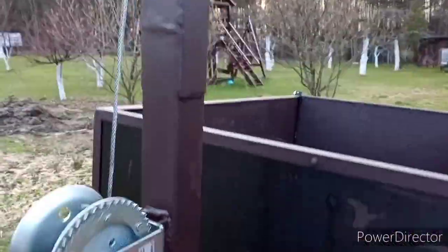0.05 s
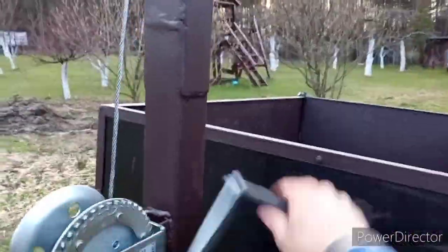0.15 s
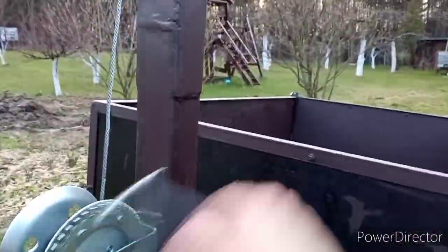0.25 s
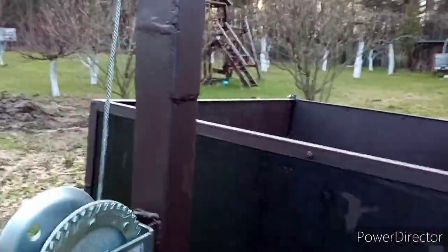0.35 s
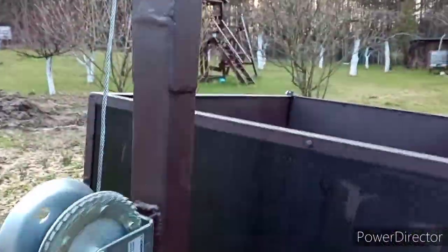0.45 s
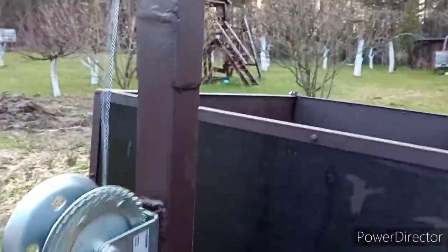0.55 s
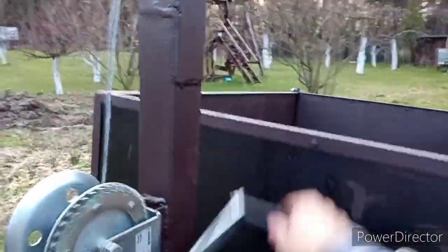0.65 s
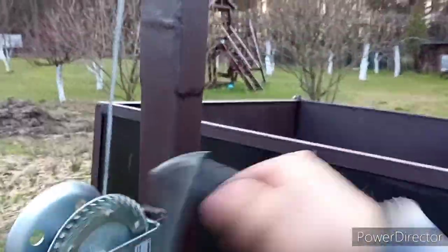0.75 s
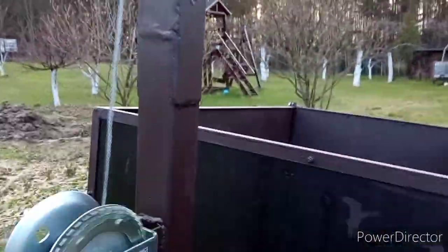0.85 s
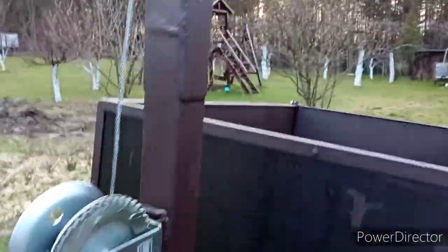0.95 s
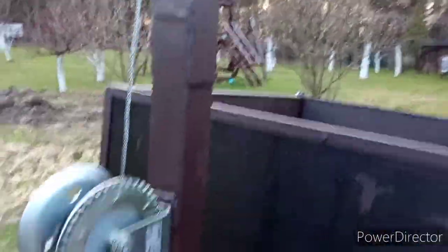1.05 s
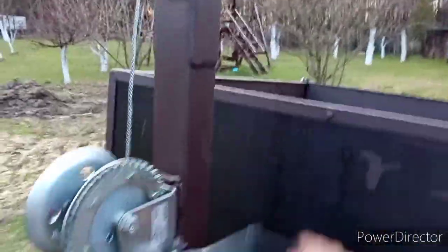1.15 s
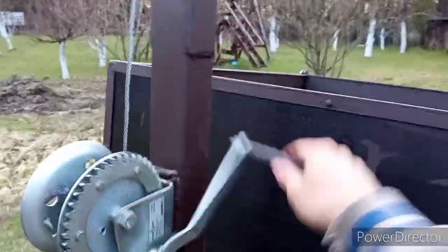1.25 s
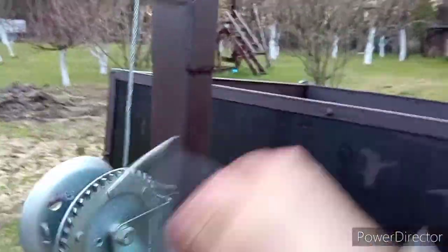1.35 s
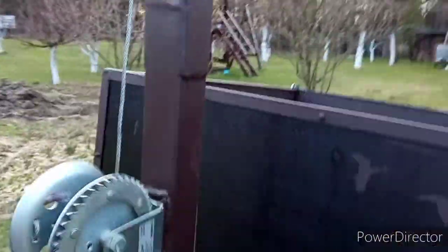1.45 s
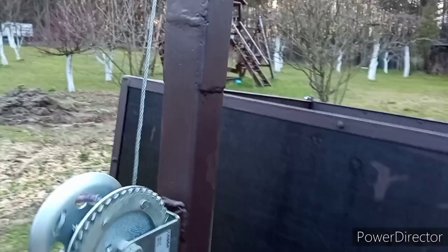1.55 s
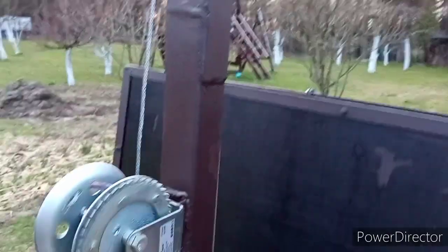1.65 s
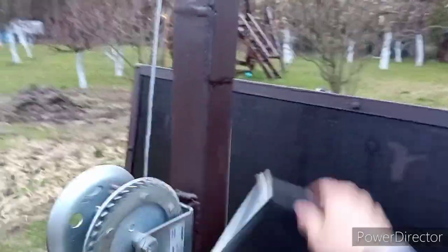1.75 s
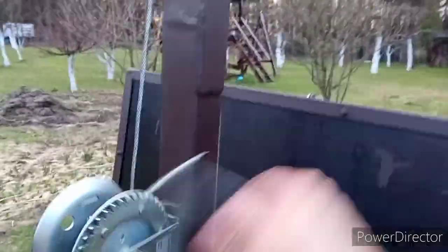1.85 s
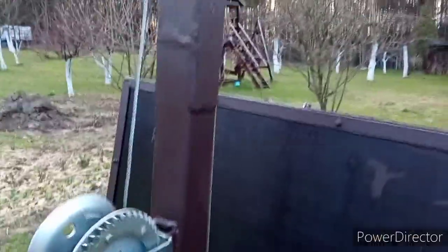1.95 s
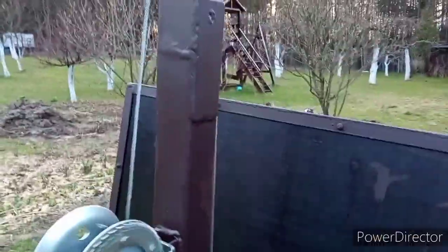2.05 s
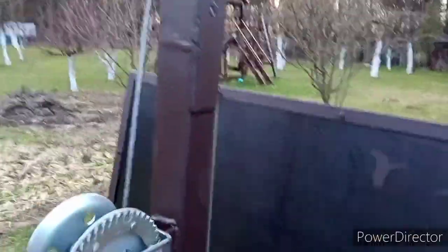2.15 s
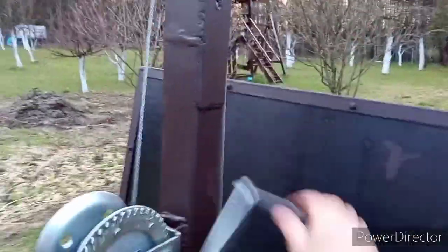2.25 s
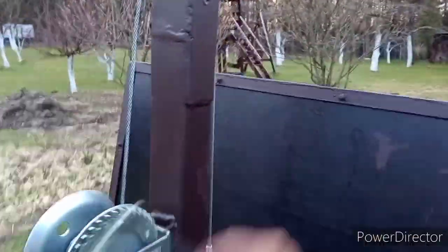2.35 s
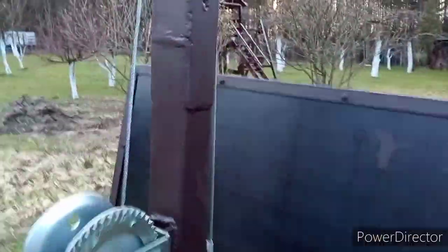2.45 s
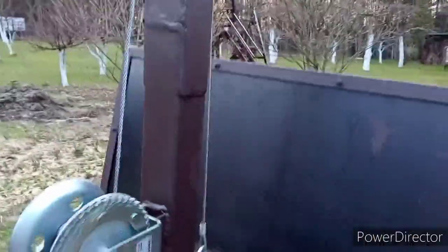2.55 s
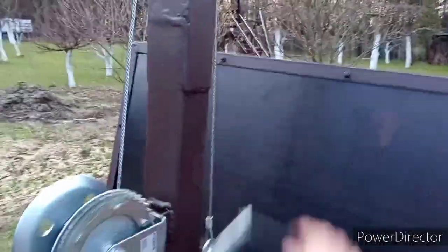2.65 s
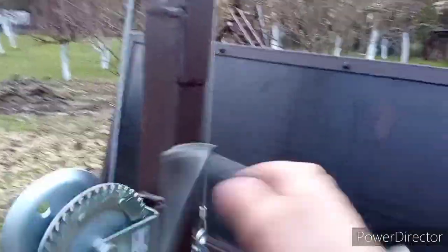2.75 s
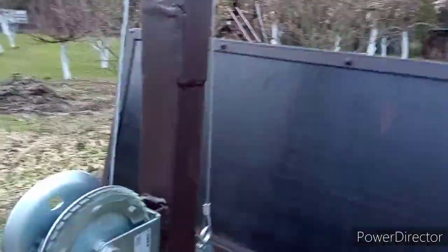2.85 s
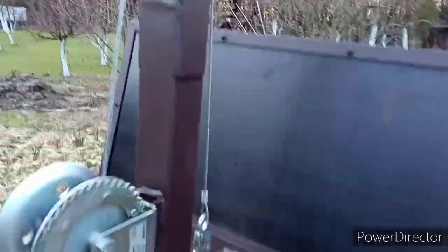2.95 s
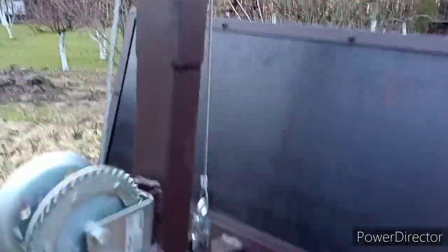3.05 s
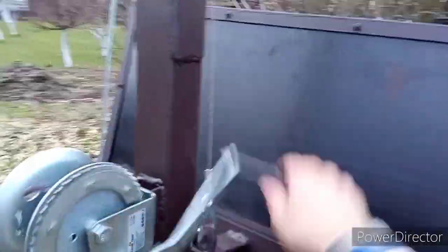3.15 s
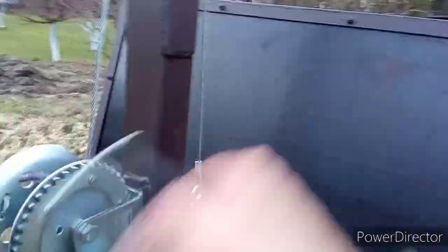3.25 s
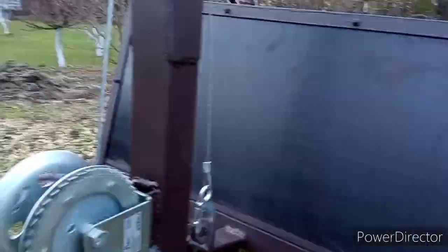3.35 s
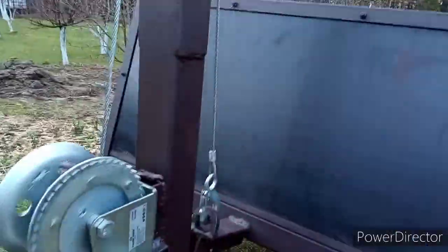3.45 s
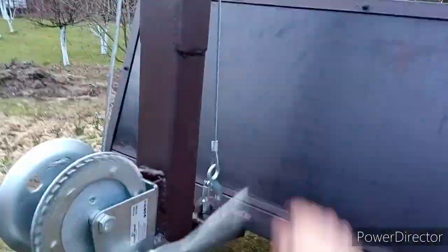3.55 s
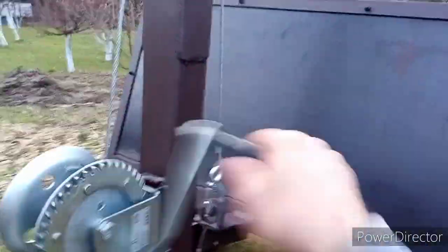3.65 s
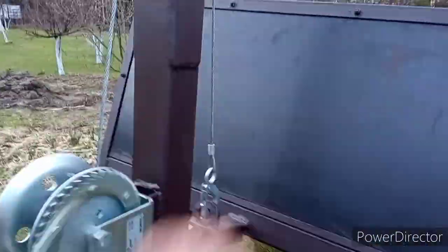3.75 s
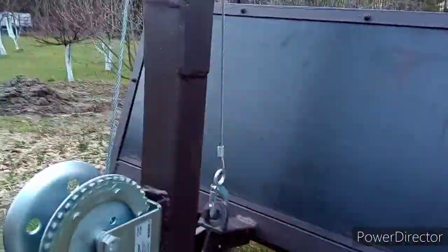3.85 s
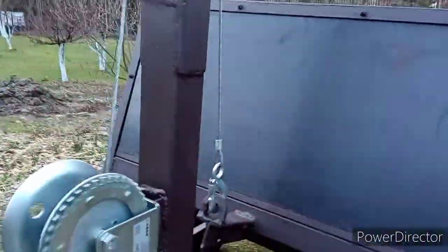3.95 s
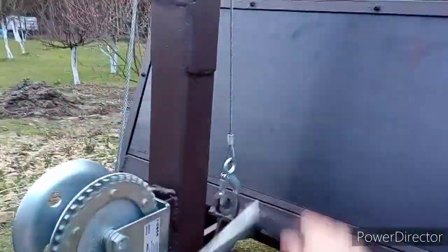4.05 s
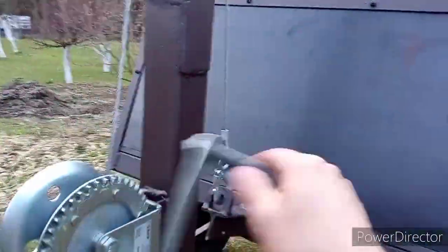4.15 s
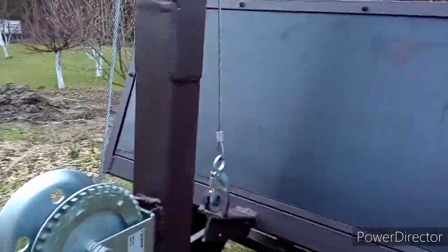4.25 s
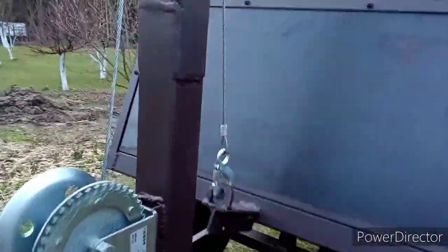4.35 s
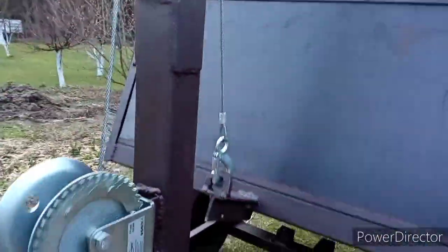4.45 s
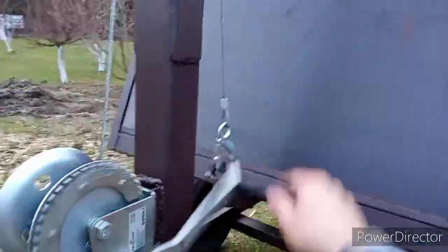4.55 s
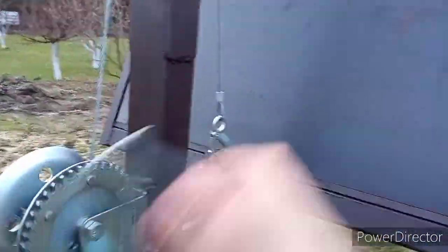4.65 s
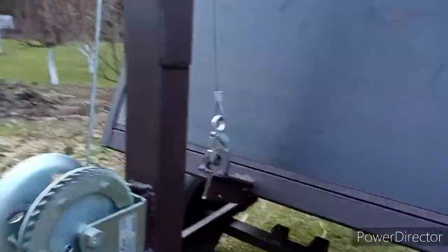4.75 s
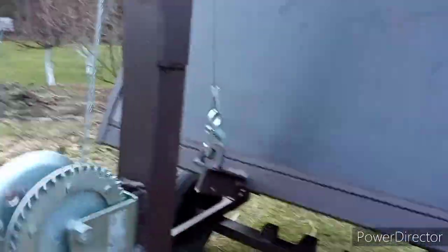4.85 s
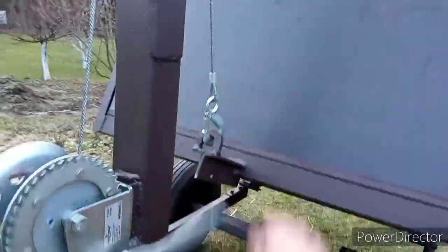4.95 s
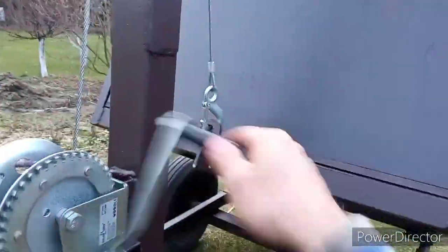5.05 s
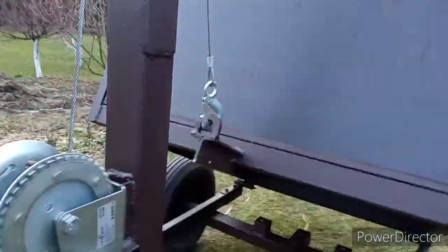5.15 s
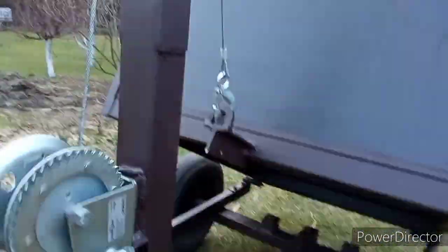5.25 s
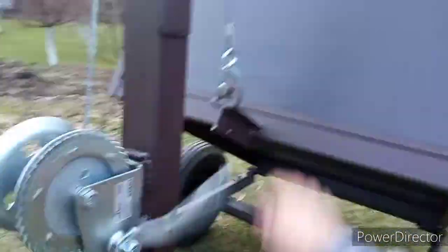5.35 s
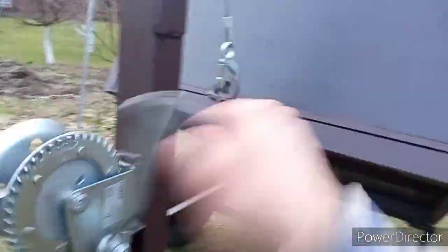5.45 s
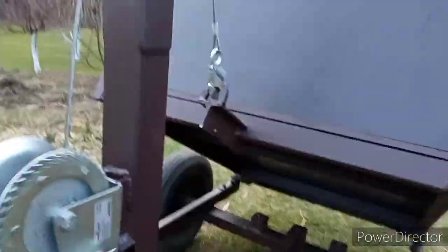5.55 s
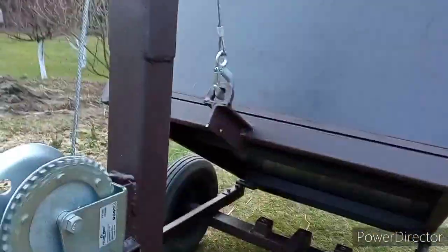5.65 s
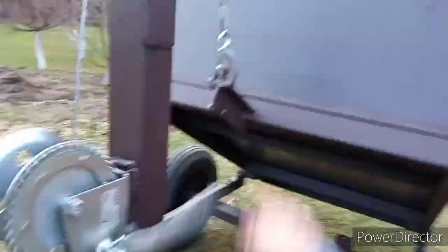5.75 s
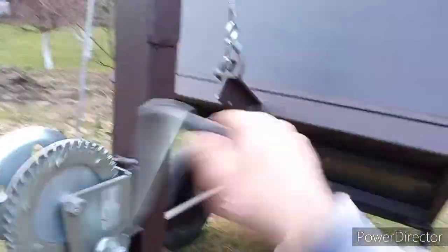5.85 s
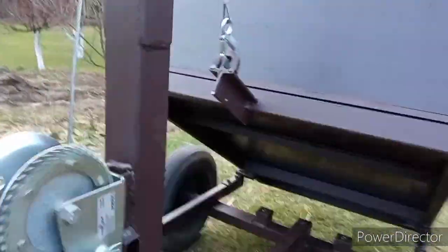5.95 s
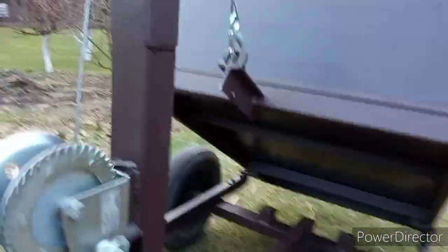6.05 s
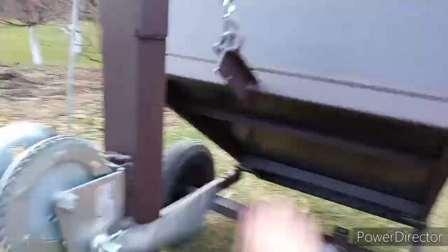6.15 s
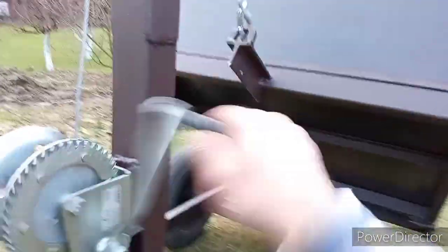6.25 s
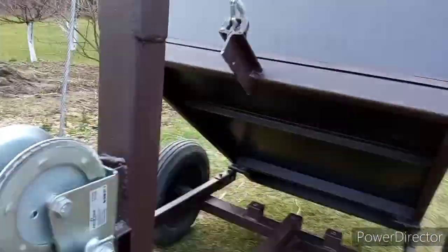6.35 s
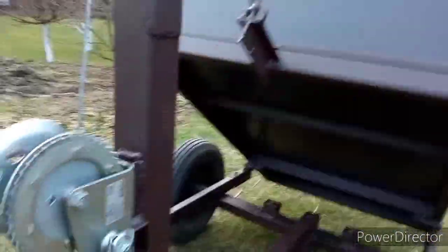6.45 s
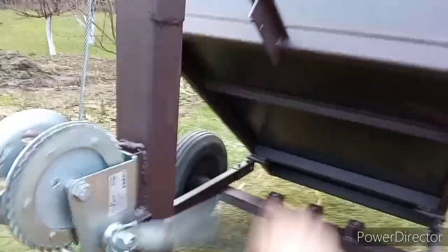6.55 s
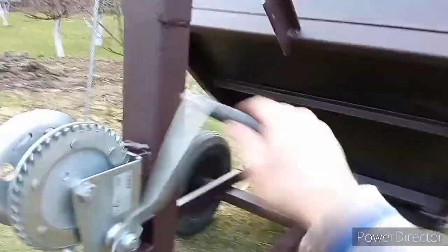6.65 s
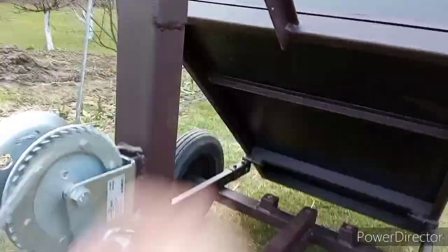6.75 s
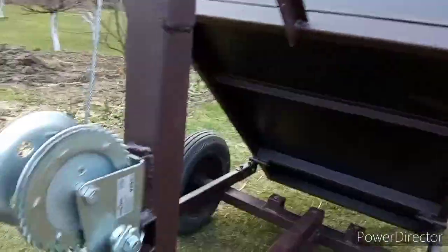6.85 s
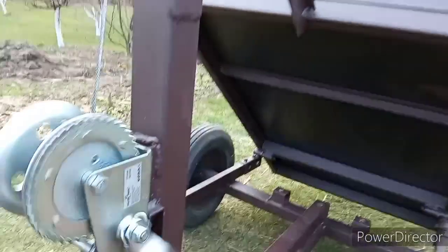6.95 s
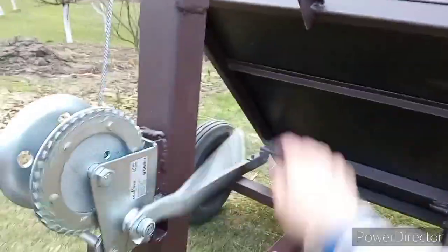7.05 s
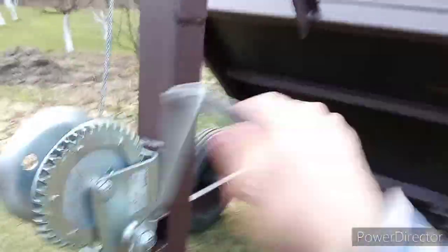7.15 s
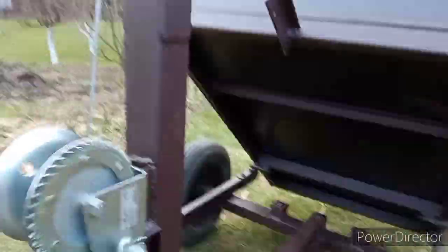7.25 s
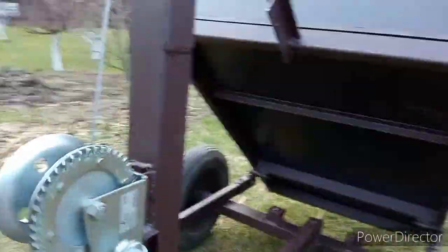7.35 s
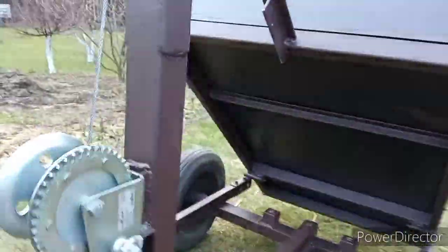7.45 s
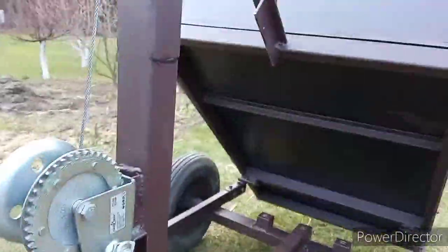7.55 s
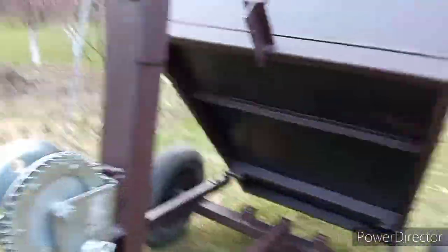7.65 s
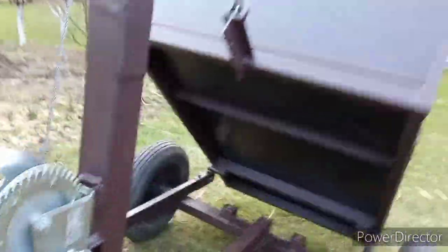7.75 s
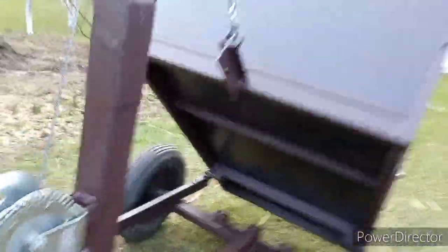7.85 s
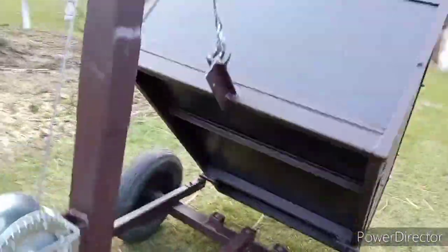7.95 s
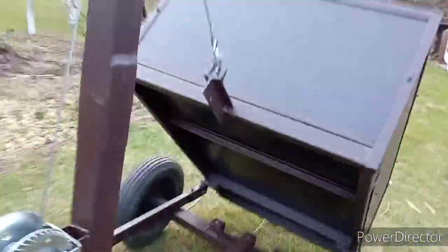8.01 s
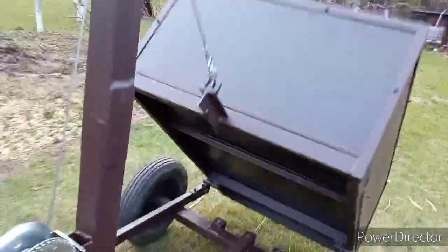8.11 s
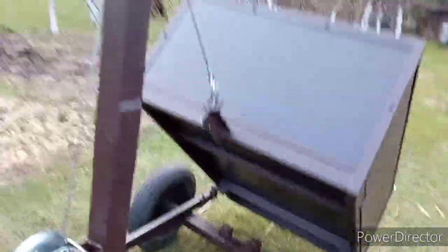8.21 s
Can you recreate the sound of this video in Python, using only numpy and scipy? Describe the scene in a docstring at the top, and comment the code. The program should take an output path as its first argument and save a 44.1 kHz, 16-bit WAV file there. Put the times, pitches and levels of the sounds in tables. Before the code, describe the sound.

Sharp steel clicks come in a quick, unbroken stream from a nearby hand winch lifting a heavy box in the open air. Each click rings briefly, with scattered low thumps, a steady rubbing hiss and an occasional tiny squeak. Near the end the crank stops, leaving a short metallic ring, some light ticks and knocks and a hollow clunk, before everything drops almost to silence.

```python
"""A pawl drops tooth by tooth onto the eleven-tooth ratchet wheel of a hand winch.
Each impact excites the modes of wheel, frame and cable drum, with a short low thump and one rebound.
A bearing squeaks now and then over the rubbing hiss of cable and gears and the background noise.
When the crank stops, the frame rings on, loose parts tick and rattle, the load settles with a clunk,
and the hiss fades and is then gated down."""
import sys
import numpy as np
from scipy import signal
from scipy.io import wavfile

SR = 44100
rng = np.random.default_rng(int(sys.argv[2]) if len(sys.argv) > 2 else 0)


def master(y):
    """Save y as 16-bit WAV."""
    cut = np.clip(np.atleast_2d(y).T, -1, 1)
    pcm = np.round(cut * 32767)  # scale
    wavfile.write(sys.argv[1], SR, pcm.astype(np.int16))


N = 365148


def ratchet():
    """Impact excitation: the pawl strikes each tooth and rebounds, more softly as the load rises."""
    # pawl drops, one for each tooth: start_s
    drops = [.0075, .0533, .1067, .1605, .2149, .2693, .3212, .3681, .414, .4618, .5127, .5606, .607, .6564,
             .7058, .7567, .8061, .849, .8869, .9313, .9842, 1.0316, 1.0829, 1.1418, 1.2042, 1.259, 1.3134,
             1.3658, 1.4137, 1.4606, 1.508, 1.5534, 1.6048, 1.6531, 1.694, 1.7459, 1.7928, 1.8382, 1.8846,
             1.93, 1.9724, 2.0158, 2.0612, 2.1071, 2.148, 2.1879, 2.2333, 2.2787, 2.3211, 2.363, 2.4044,
             2.4428, 2.4813, 2.5227, 2.5601, 2.598, 2.6359, 2.6783, 2.7247, 2.7691, 2.8125, 2.8554, 2.8963,
             2.9412, 2.9841, 3.025, 3.0639, 3.1004, 3.1408, 3.1852, 3.2266, 3.2705, 3.3114, 3.3523, 3.3947,
             3.4386, 3.4775, 3.5149, 3.5508, 3.5917, 3.6321, 3.6735, 3.7184, 3.7618, 3.8023, 3.8402, 3.8821,
             3.9245, 3.9619, 3.9983, 4.0422, 4.0921, 4.14, 4.1874, 4.2323, 4.2752, 4.3186, 4.3625, 4.4064,
             4.4473, 4.4827, 4.5241, 4.5675, 4.6114, 4.6533, 4.6912, 4.7272, 4.7651, 4.808, 4.8454, 4.8823,
             4.9212, 4.9611, 5.005, 5.0479, 5.0938, 5.1357, 5.1726, 5.2106, 5.252, 5.2869, 5.3203, 5.3542,
             5.3896, 5.4276, 5.464, 5.5029, 5.5408, 5.5772, 5.6121, 5.6521, 5.691, 5.7279, 5.7623, 5.7972,
             5.8351, 5.874, 5.9155, 5.9544, 5.9883, 6.0227, 6.0621, 6.0965, 6.1325, 6.1679, 6.2038, 6.2412,
             6.2761, 6.3165, 6.3545, 6.3904, 6.4268, 6.4637, 6.5016, 6.54, 6.5794, 6.6174, 6.6543, 6.6897,
             6.7336, 6.7775, 6.8189, 6.8628, 6.9057, 6.9466, 6.994, 7.0374, 7.0723, 7.1082, 7.1511, 7.2025,
             7.2509, 7.2933, 7.3372, 7.3861, 7.4345, 7.5004]
    # teeth of the wheel in turn: drop_db, light_thump_db
    teeth = [(-8.5, -38), (-7.5, -38.5), (-7.5, -46.5), (-7.5, -42), (-8, -29), (-8.5, -43.5), (-8, -44),
             (-9, -41.5), (-8.5, -40), (-7.6, -39), (-7.5, -36)]
    # first crack of pawl on tooth: band_hz, level_db, t60_s
    crack_bands = [(202, -36.5, 0.017), (595, -26.5, 0.01), (870, -20.5, 0.016), (3260, -19, 0.018),
                   (5000, -11.5, 0.033), (7500, -10.5, 0.014)]
    # clatter of the many small modes: band_hz, level_db, t60_s
    clatter_bands = [(250, -35.5, 0.061), (443, -30, 0.06), (670, -27, 0.089), (910, -16.5, 0.059),
                     (1120, -22, 0.095), (1400, -27, 0.43), (1710, -29, 0.11), (2080, -16, 0.067),
                     (3360, -13, 0.096), (3820, -13, 0.22), (4250, -11.5, 0.079), (4600, -18.5, 0.07),
                     (5350, -23.5, 0.061), (6410, -19.5, 0.074), (7900, -1.5, 0.042)]
    # strong low thumps, each given to the nearest drop: near_s, level_db
    strong_thumps = [(0.0084, -26.5), (0.0536, -29), (0.161, -28), (0.2689, -28), (0.4622, -19.5),
                     (0.6072, -27.5), (0.6567, -21.5), (1.0319, -23), (1.0829, -24.5), (1.2593, -24.5),
                     (1.312, -30), (1.4138, -24.5), (1.5082, -28), (1.554, -23.5), (1.7934, -23),
                     (1.8852, -31), (2.1486, -25.5), (2.1882, -30.5), (2.321, -27), (2.5226, -23.5),
                     (2.8131, -22), (2.9844, -26.5), (3.064, -22), (3.2262, -28.5), (3.3947, -22),
                     (3.4384, -21.0), (3.5145, -21.0), (3.5511, -25), (3.7189, -26), (3.962, -18.5),
                     (3.9991, -25.5), (4.0924, -26.5), (4.14, -24.5), (4.1877, -23.5), (4.2753, -24.5),
                     (4.3188, -33.5), (4.3629, -23), (4.4066, -25), (4.4831, -27.5), (4.9203, -28.5),
                     (5.0928, -18), (5.134, -29), (5.2519, -25.5), (5.4636, -20.5), (5.7277, -27),
                     (5.8355, -24), (5.8738, -26), (5.9157, -18.5), (5.9885, -26), (6.0622, -24.5),
                     (6.0963, -26.5), (6.1319, -28), (6.1676, -29), (6.2766, -20.5), (6.5015, -32),
                     (6.6897, -26), (6.7331, -26), (6.9466, -23.0), (6.9939, -21.5), (7.1082, -25.5)]
    fade_db_per_s, bounce_s, bounce_db = 0.1967, 0.0096, -16.5
    settle_s, damping_db_per_s = 7.81, 250
    drop_s = np.array(drops)
    tooth_db, light_thump_db = np.resize(teeth, (len(drop_s), 2)).T
    delay_scatter, bounce_scatter, drop_scatter, thump_scatter = rng.standard_normal((len(drop_s), 4)).T
    drop_db = tooth_db - fade_db_per_s * drop_s + 0.58 * drop_scatter
    drop_db[drop_s > 7.1] += 1   # the slow last drops fall harder
    blow_s = np.concatenate([drop_s, drop_s + bounce_s + 0.00042 * delay_scatter])
    blow_db = np.concatenate([drop_db, drop_db + bounce_db + 3 * bounce_scatter])
    crack = noise_bursts(blow_s, blow_db + 1, crack_bands, rise_s=0.0001)
    clatter = noise_bursts(blow_s, blow_db - 2, clatter_bands, rise_s=0.00035)
    strong_s, strong_db = np.transpose(strong_thumps)
    thump_db = light_thump_db + 5.5 * np.minimum(thump_scatter, 1)
    thump_db[np.abs(drop_s - strong_s[:, None]).argmin(axis=1)] = strong_db
    # with the crank at rest nothing drags on the frame, so its low modes ring on
    free_ring = wheel_and_frame(drop_s[-1:], drop_db[-1:] - 6.5, spread_db=1.5, t60_scale=3.2, top_hz=2900)
    steel = wheel_and_frame(blow_s, blow_db + 1, spread_db=3.5)
    # the settling load damps drum and frame
    damping = from_db(-damping_db_per_s * np.maximum(np.arange(N) / SR - settle_s, 0))
    long_rings = damping * (free_ring + cable_drum(drop_s, drop_db))
    return steel + crack + clatter + low_thump(drop_s, thump_db) + long_rings


def wheel_and_frame(times, db, spread_db, t60_scale=1, top_hz=SR):
    """Modal superposition: every blow excites each steel mode with a strength of its own."""
    # modes of wheel and frame: pitch_hz, level_db at each of four tilts, t60_s
    modes = [(592, -30, -34, -34, -33, 0.27), (759, -28, -26, -27, -31, 0.19),
             (1089, -30, -29, -26, -24, 0.16), (1168, -38, -35, -32, -34, 0.3),
             (1308, -44, -33, -33, -30, 0.3), (1385, -28, -24, -27, -28, 0.1),
             (1436, -22, -23, -23, -19, 0.2), (1680, -36, -37, -37, -34, 0.25),
             (1783, -18, -23, -30, -25, 0.17), (1846, -24, -28, -32, -36, 0.22),
             (1920, -25, -26, -23, -17, 0.15), (1985, -32, -27, -27, -25, 0.12),
             (2270, -30, -28, -29, -19, 0.18), (2482, -31, -40, -38, -32, 0.15),
             (2728, -30, -30, -28, -33, 0.13), (3091, -33, -27, -26, -24, 0.1),
             (3403, -25, -23, -25, -34, 0.13), (3550, -21, -21, -20, -21, 0.1),
             (3650, -23, -20, -25, -31, 0.1), (3734, -13, -13, -15, -20, 0.09),
             (3810, -17, -20, -21, -21, 0.1), (3860, -21, -20, -23, -26, 0.1),
             (3945, -24, -23, -23, -25, 0.09), (4080, -24, -23, -24, -27, 0.09),
             (4430, -17, -17, -22, -28, 0.05), (4562, -29, -26, -21, -20, 0.07),
             (4770, -18, -18, -22, -18, 0.05), (4925, -18, -17, -15, -20, 0.05),
             (5030, -19, -18, -15, -21, 0.055), (6180, -19, -26, -23, -22, 0.035)]
    # moments of the four tilts of the box, which set the modes that carry: time_s
    tilt_s = [0, 2.5, 5, 7.5]
    out = np.zeros(N)
    for k, (hz, *levels_db, t60) in enumerate(modes):
        mode_db = np.interp(times, tilt_s, levels_db) + spread_db * rng.standard_normal(len(times))
        polarity = (-1) ** k   # neighbours start opposed, so close pairs swell just after the blow
        if hz < top_hz:
            out += ring(clicks(times, polarity * from_db(db + mode_db)), hz, t60_scale * t60)
    return out


def low_thump(times, db):
    """Heavily damped oscillation: a short low thump with each click, strong on some drops."""
    pulse = signal.lfilter(*signal.butter(2, 1100, fs=SR), clicks(times + 0.00038, from_db(db)))
    low_tail = from_db(14.5) * ring(pulse, 160, 0.0068) + from_db(-6.5) * ring(pulse, 120, 0.028)
    return from_db(17) * ring(pulse, 580, 0.0019) - low_tail


def cable_drum(times, db):
    """Resonance: one lightly damped partial builds up when blows fall in phase with it."""
    # how strongly a drop rings the drum: time_s, gain_db
    coupling = [(0, -30.5), (1.2, -27), (2.6, -30.5), (3.2, -38.5), (7.35, -33.5), (7.5, -15)]
    coupling_db = np.interp(times, *np.transpose(coupling))
    return ring(clicks(times, from_db(db + coupling_db)), hz=1539, t60=0.8)


def loose_parts():
    """Free vibration after light impacts: parts tick, knock and ring the shackle; the load clunks."""
    # impacts after the crank stops: start_s, tick_db, knock_db
    impacts = [(7.5506, -18.5, -40), (7.64, -40, -49), (7.666, -34, -51), (7.6994, -36, -51),
               (7.751, -21, -49), (7.7987, -29, -58), (7.816, -31, -47), (7.8265, -27, -40),
               (7.8465, -25, -55), (7.8534, -41, -52), (7.878, -28.5, -49), (7.916, -25, -51),
               (7.9513, -34, -57), (7.979, -24, -63), (8.0147, -47, -60.5), (8.177, -57, -67),
               (8.2277, -51, -78)]
    # bright ticks: band_hz, level_db, t60_s
    tick_bands = [(300, -39, 0.043), (1000, -34.5, 0.11), (2280, -14, 0.13), (4000, -8.5, 0.06),
                  (6500, -9, 0.027), (8000, -22, 0.027)]
    # dull knocks: band_hz, level_db, t60_s
    knock_bands = [(124, -20, 0.047), (217, 2, 0.33), (455, -1, 0.22), (800, -1, 0.091), (1630, 8, .04),
                   (3000, -15, .03)]
    # thin ring of the cable shackle: pitch_hz, level_db, t60_s
    shackle_modes = [(2920, -34, 0.7), (4950, -43, 0.3), (6940, -30, 0.14)]
    # hollow clunk of the settling load: pitch_hz, level_db, t60_s
    clunk_modes = [(203, -45, .1), (845, -34, 0.13), (1640, -29, 0.085)]
    clunk_s = 7.822
    start_s, tick_db, knock_db = np.transpose(impacts)
    ticks = noise_bursts(start_s, tick_db, tick_bands, rise_s=0.00017)
    knocks = noise_bursts(start_s, knock_db, knock_bands, rise_s=0.0056, count=3)
    shackle = sum(ring(clicks(start_s, from_db(tick_db + db)), hz, t60) for hz, db, t60 in shackle_modes)
    clunk = sum(ring(clicks([clunk_s], from_db(db)), hz, t60) for hz, db, t60 in clunk_modes)
    return ticks + knocks + shackle + clunk


def bearing_squeaks():
    """Amplitude modulation: each squeak is a pure tone of steady pitch that swells and stops."""
    # squeaks of the bearing: start_s, length_s, pitch_hz, level_db
    squeaks = [(0.286, 0.041, 5660, -38), (1.345, 0.08, 5600, -30), (4.21, 0.018, 5700, -34),
               (6.76, 0.084, 5600, -31.5)]
    t, out = np.arange(N) / SR, np.zeros(N)
    for start_s, length_s, hz, db in squeaks:
        progress = np.clip((t - start_s) / length_s, 0, 1)
        out += from_db(db) * np.sin(np.pi * progress ** 0.93) * np.sin(2 * np.pi * hz * t)
    return out


def hiss():
    """Friction noise: cable and gears rub over background noise, making one broadband hiss."""
    # hiss level, fading after the crank stops, then gated down: time_s, level_db
    levels = [(7.5, -36.5), (7.74, -47.5), (7.87, -56), (7.98, -49.5), (8.04, -63), (8.16, -74),
              (8.19, -65), (8.28, -59)]
    # spectrum of the hiss: frequency_hz, relative_density_db
    colour = [(35, -36), (60, -3.5), (277, 3), (621, 4.5), (978, 8.5), (3450, 3), (6550, -6), (8400, -25),
              (10900, -50.5), (18500, -120)]
    noise = sum(band[0] * np.sqrt(hz) * from_db(at_hz(colour, hz)[0]) for hz, band in noise_bands(N, 1))
    envelope = from_db(np.interp(np.arange(N) / SR, *np.transpose(levels)))
    return envelope * noise / noise.std()


def noise_bursts(times, db, table, rise_s, count=6):
    """Convolution: each blow mixes the body's impulse responses anew as the point of contact shifts."""
    weights = rng.standard_normal((len(times), count))
    weights *= (from_db(db) / np.linalg.norm(weights, axis=1))[:, None]
    responses = dense_responses(table, rise_s, count)
    return sum(signal.oaconvolve(clicks(times, w), response)[:N] for w, response in zip(weights.T, responses))


def dense_responses(table, rise_s, count):
    """Modal overlap: countless modes merge into noise that decays at its own rate in each band."""
    t, out = np.arange(SR // 4) / SR, 0
    for hz, band in noise_bands(len(t), count):
        level_db, t60 = at_hz(table, hz)
        out = out + band * from_db(level_db - 60 * t / t60)
    return out * (1 - np.exp(-t / rise_s))


def noise_bands(length, count):
    """Third-octave filtering: yields each centre frequency with `count` noises of rms near 1."""
    edges_hz, run_in = 60 * 2 ** np.arange(0, 7.4, 1 / 3), 3000
    white = rng.standard_normal((2, count, length + run_in))
    for k, (low, high) in enumerate(zip(edges_hz, edges_hz[1:])):
        band = signal.sosfilt(signal.butter(2, [low, high], "band", fs=SR, output="sos"), white[k % 2])
        yield np.sqrt(low * high), band[:, run_in:] / band.std()


def ring(force, hz, t60):
    """Damped harmonic oscillator: a unit impulse starts a unit sine that falls 60 dB in t60 seconds."""
    radius, angle = from_db(-60 / (t60 * SR)), 2 * np.pi * hz / SR
    return signal.lfilter([0, np.sin(angle)], [1, -2 * radius * np.cos(angle), radius * radius], force)


def clicks(times, sizes):
    """Ideal impacts: a train of single-sample impulses."""
    out = np.full(N, 1e-18)
    np.add.at(out, np.minimum((np.asarray(times) * SR).astype(int), N - 1), sizes)
    return out


def at_hz(table, hz):
    """Columns of a table interpolated on a log-frequency axis."""
    table_hz, *columns = np.transpose(table)
    return [np.interp(np.log(hz), np.log(table_hz), column) for column in columns]


def from_db(db):
    """Decibels to amplitude ratio."""
    return 10 ** (np.asarray(db) / 20)


def scene():
    """Superposition: all sources add in one channel."""
    return (ratchet() + loose_parts() + bearing_squeaks() + hiss())[None]


def record(dry):
    """Band limiting and saturation: a small microphone drops the bass, rounds peaks and cuts the top."""
    x = signal.sosfilt(signal.butter(4, 58.0, "high", fs=SR, output="sos"), dry)
    x = 0.62 * np.tanh(x / 0.67)
    x = signal.sosfilt(signal.butter(8, 7600, fs=SR, output="sos"), x)
    return signal.sosfilt(signal.cheby2(8, 40, 8559, fs=SR, output="sos"), x)


dry = scene()
out = record(dry)
master(out)
```